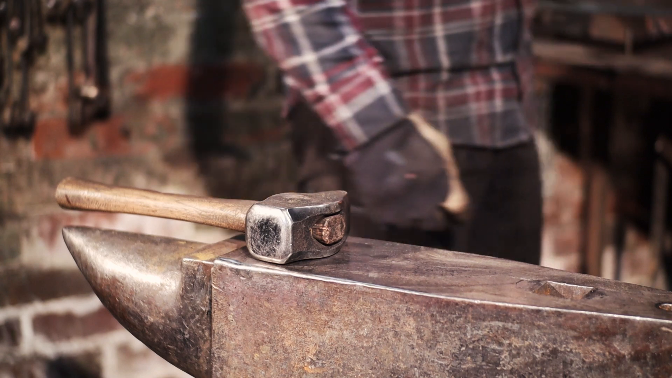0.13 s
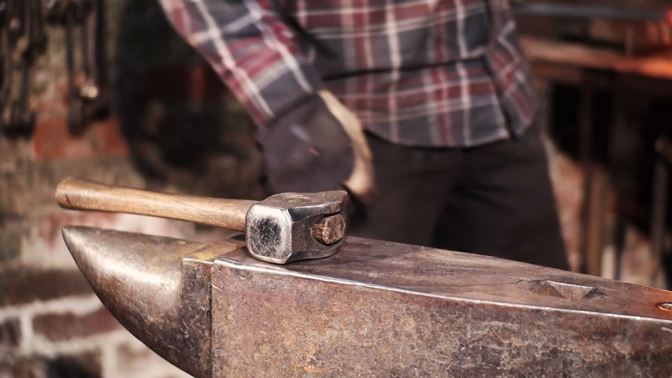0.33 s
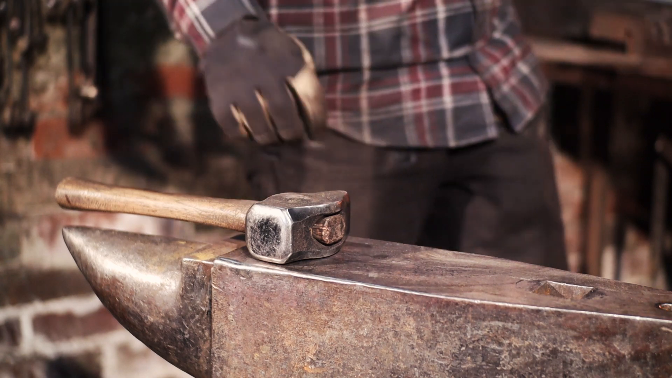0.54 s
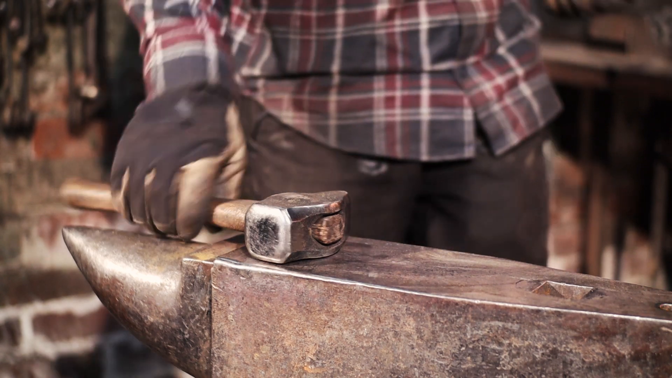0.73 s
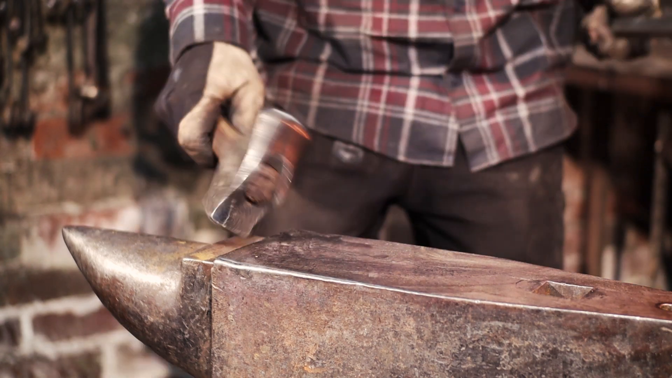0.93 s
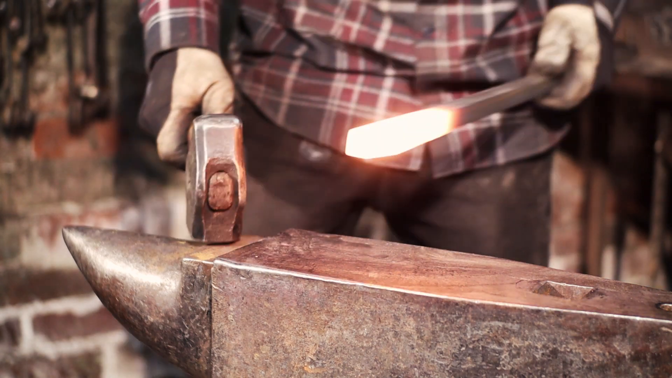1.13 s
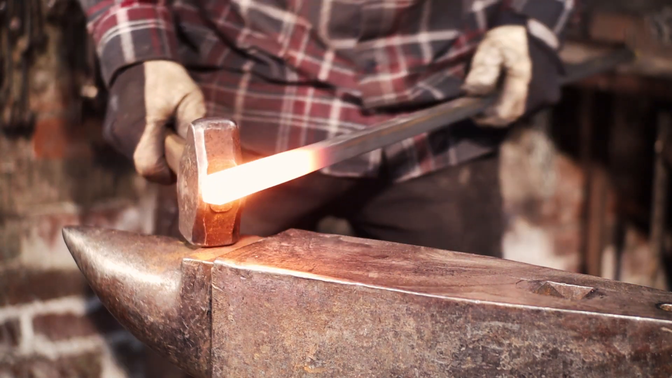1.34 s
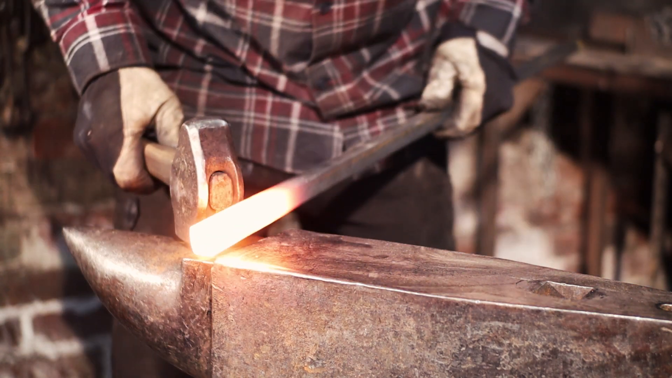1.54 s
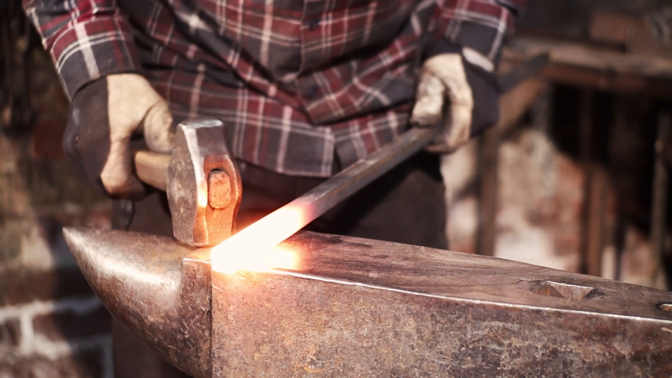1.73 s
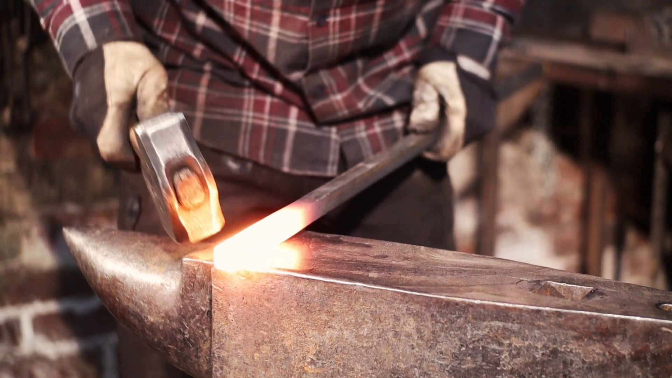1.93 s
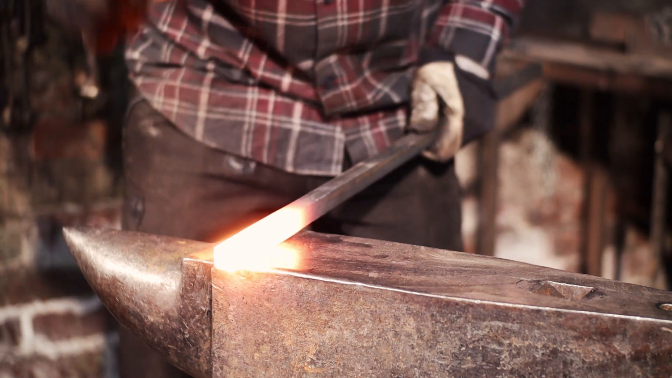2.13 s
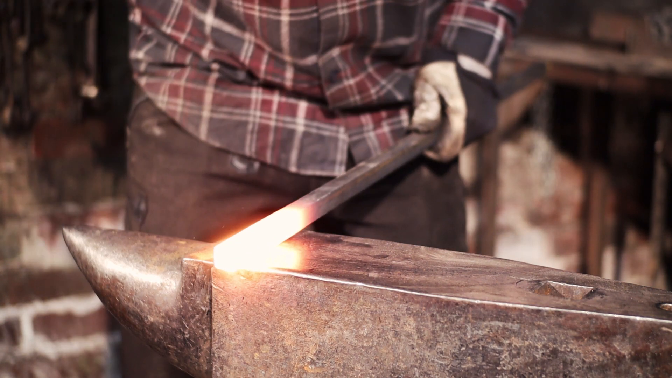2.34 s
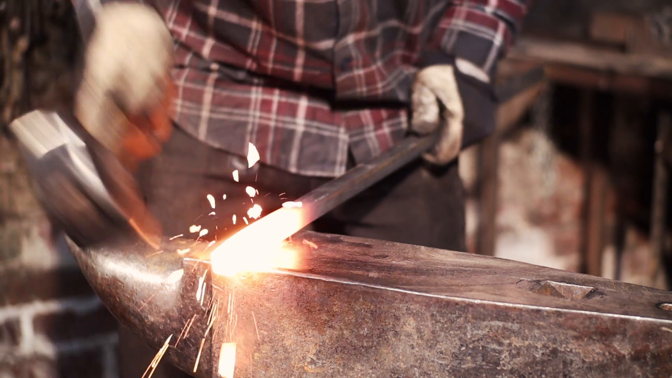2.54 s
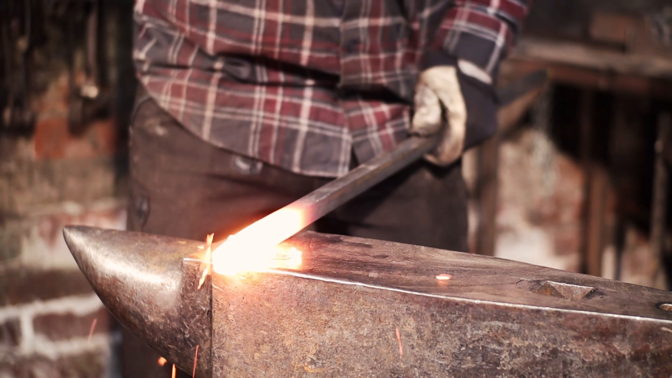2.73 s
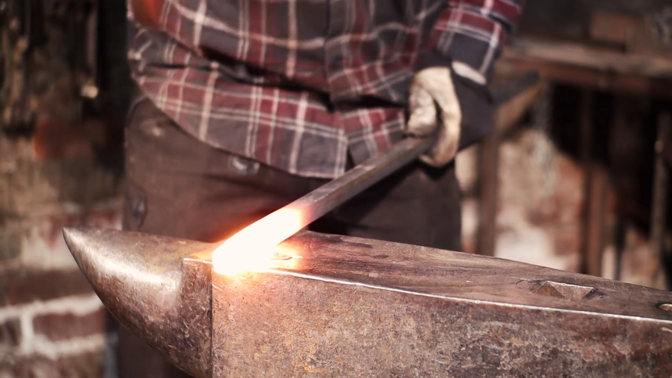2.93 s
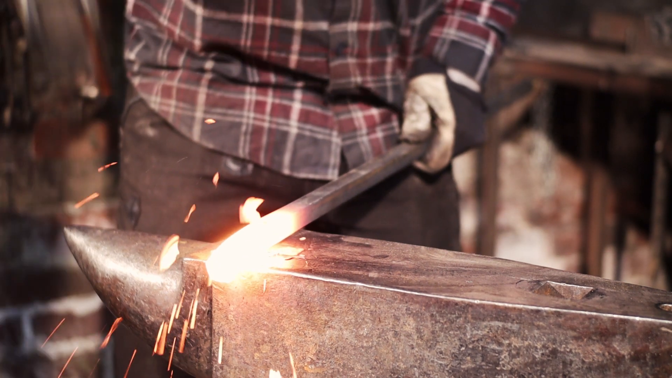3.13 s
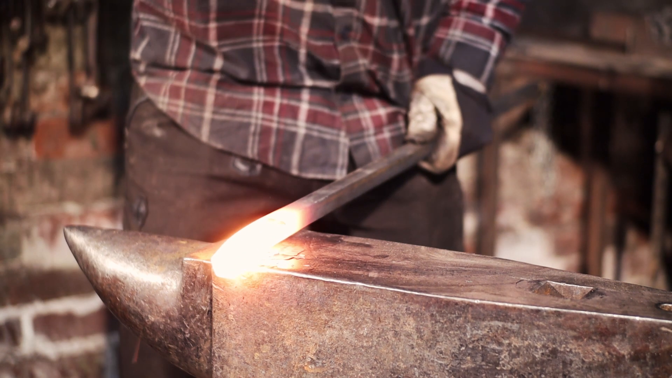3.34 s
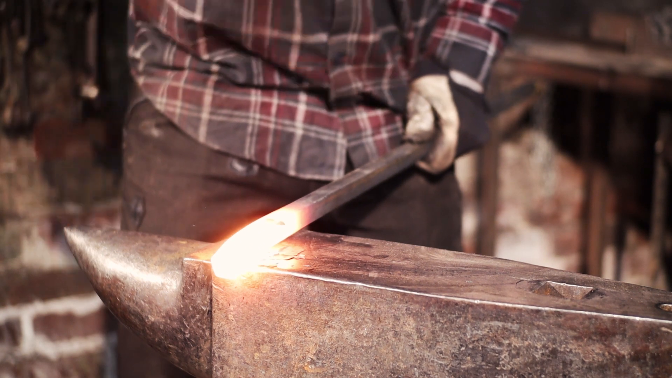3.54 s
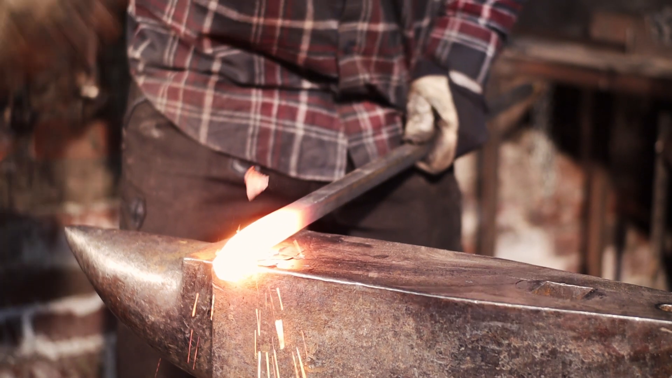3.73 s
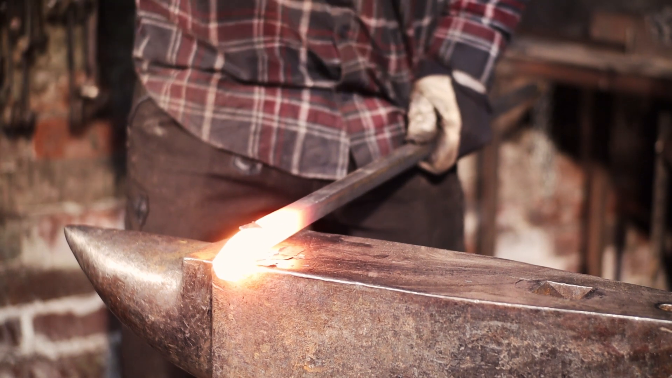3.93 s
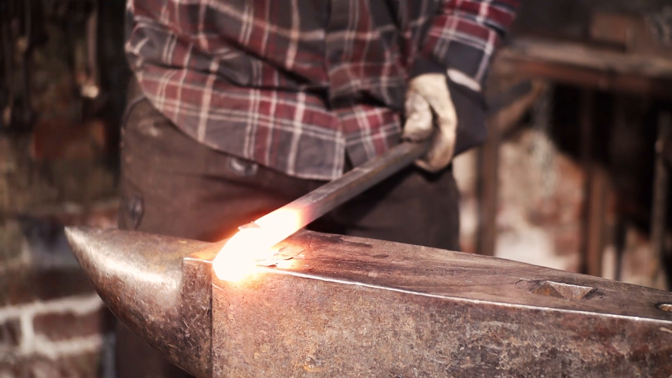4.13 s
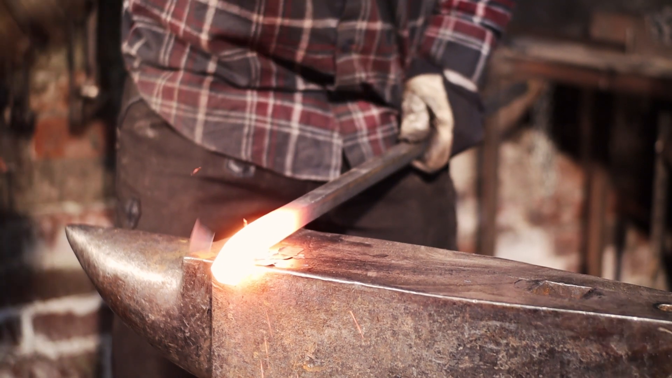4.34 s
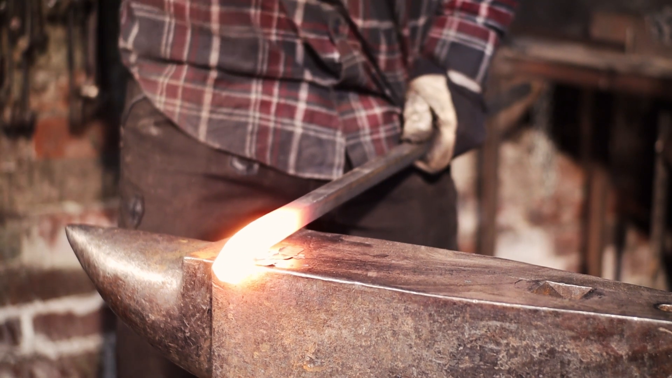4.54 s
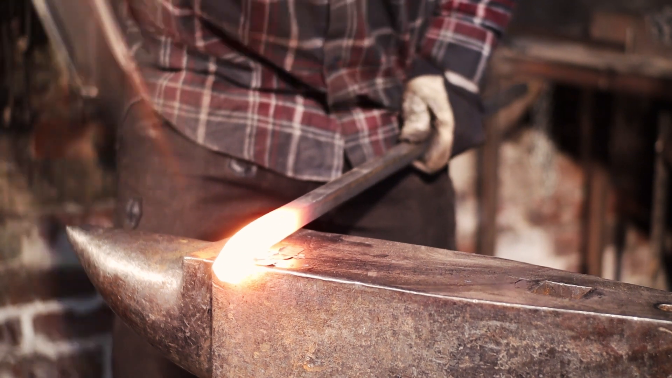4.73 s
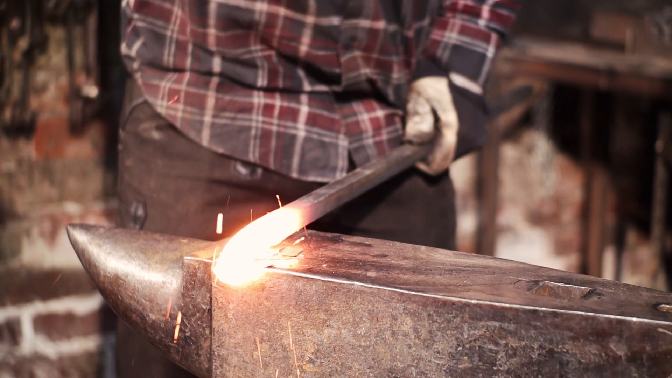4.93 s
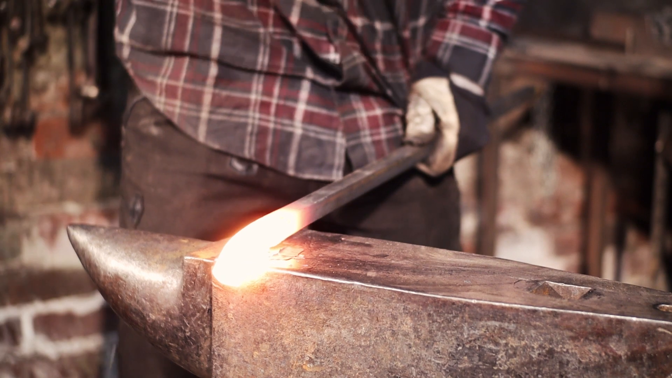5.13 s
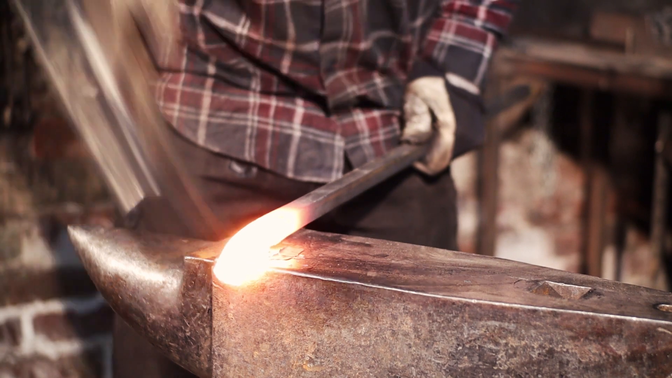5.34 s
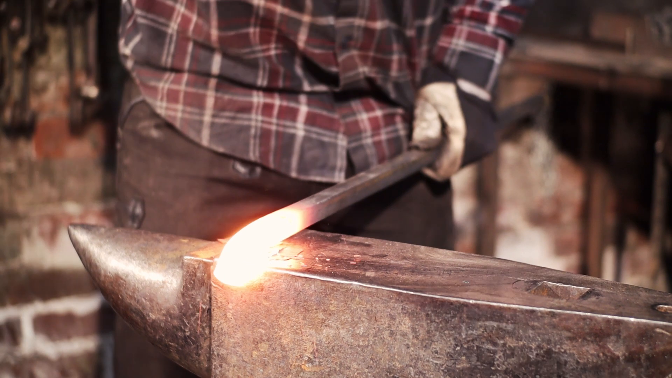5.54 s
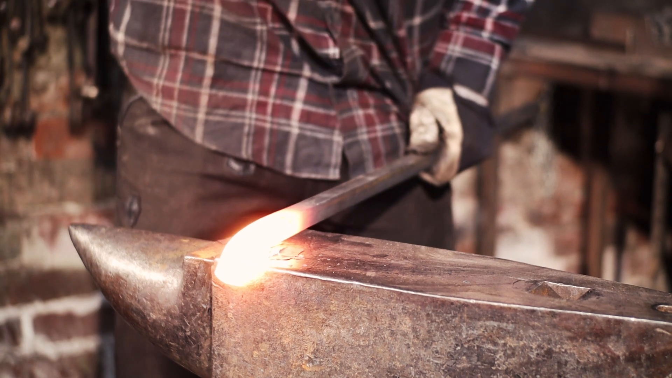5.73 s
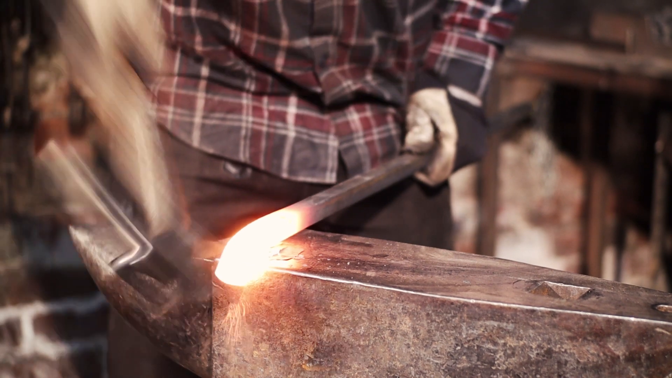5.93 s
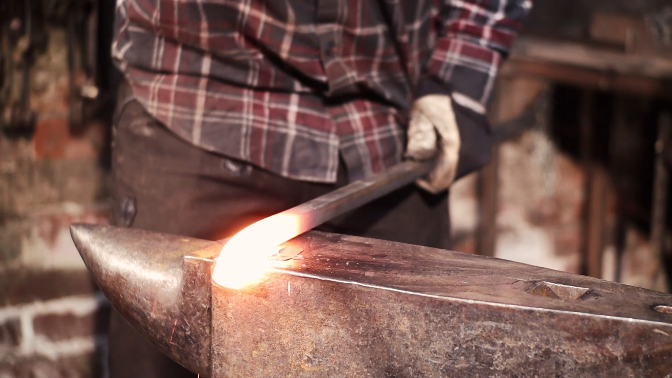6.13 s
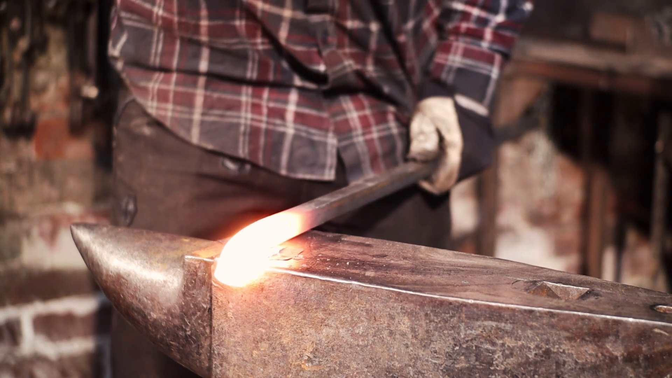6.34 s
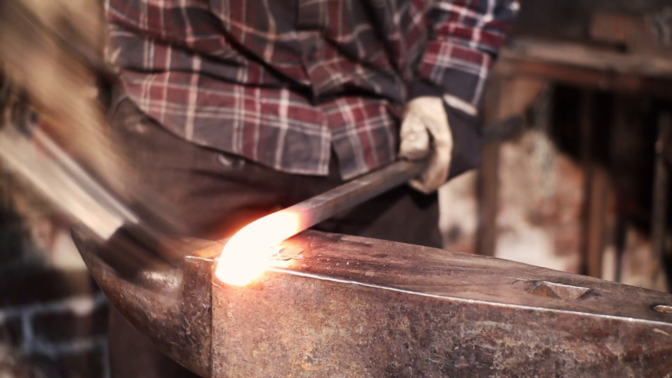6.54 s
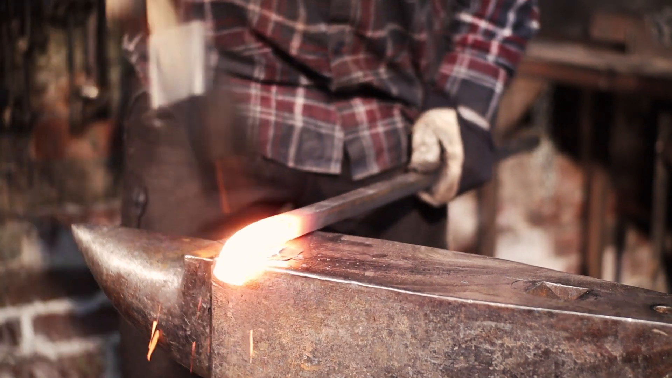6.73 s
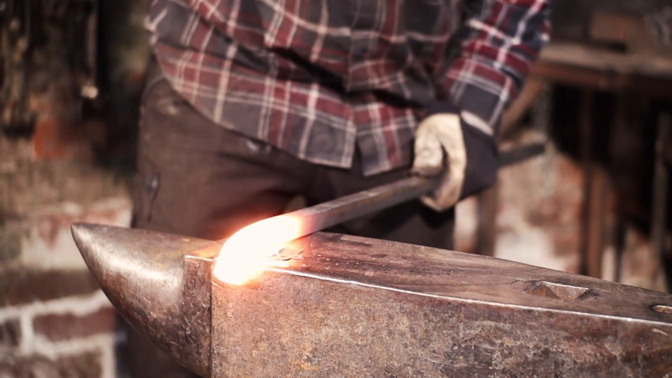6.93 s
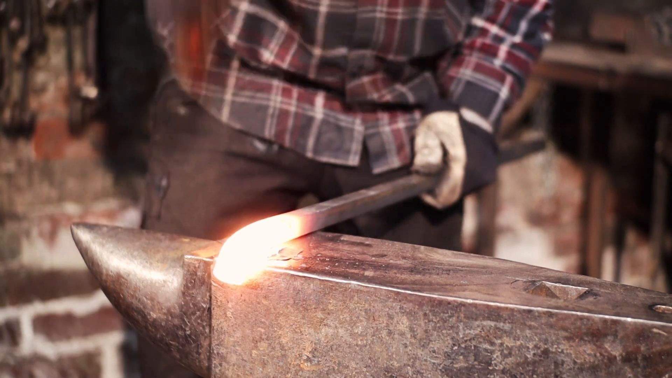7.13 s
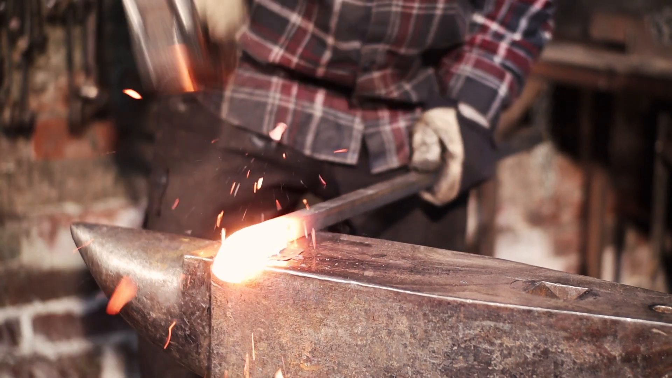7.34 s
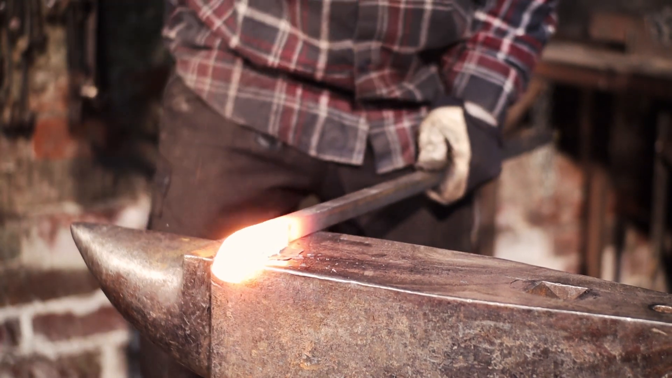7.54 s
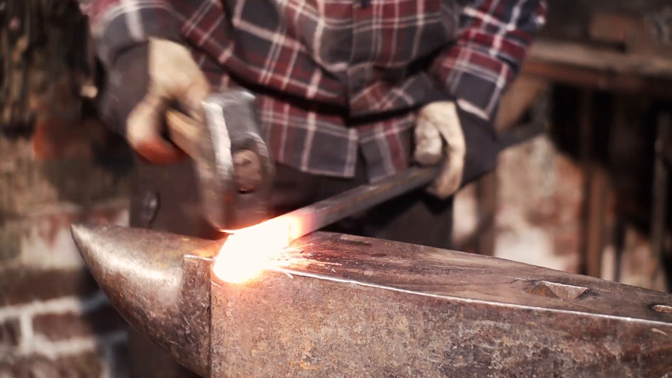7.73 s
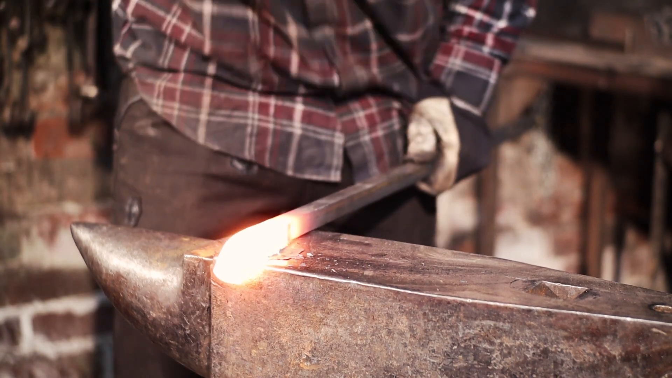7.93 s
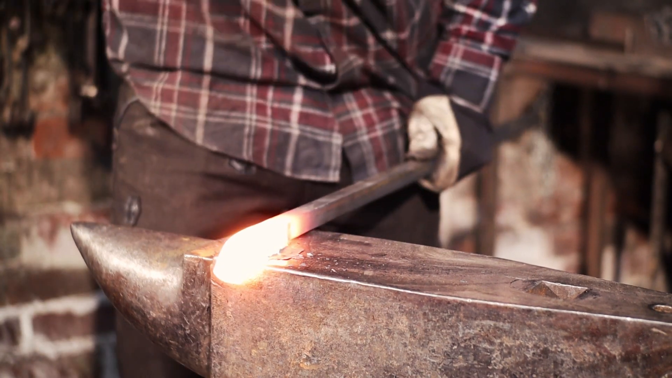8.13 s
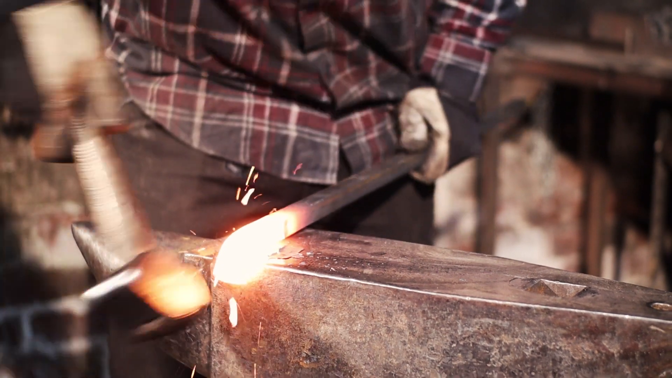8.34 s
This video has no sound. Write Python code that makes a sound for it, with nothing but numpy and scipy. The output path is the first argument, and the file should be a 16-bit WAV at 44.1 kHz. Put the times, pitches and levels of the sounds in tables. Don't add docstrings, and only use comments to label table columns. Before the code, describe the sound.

A soft fire and blower hum fills a brick forge. A metal tool drops with a quick rattling clink and a woody thump, then a hammer is lifted and set down with small knocks. A bar slides grittily into place. Steady hammer blows follow, soft at first, then hard: sharp crack, thud, short ring, low late boom. Scale flakes tick between them. Close microphone, with a short hall tail.

```python
import sys
import numpy as np
from scipy import signal
from scipy.fft import rfft, irfft
from scipy.io import wavfile
from scipy.ndimage import uniform_filter1d

SR = 44100
rng = np.random.default_rng(int(sys.argv[2]) if len(sys.argv) > 2 else 0)


def voltage_ratio(level):
    return 10 ** (np.asarray(level, float) / 20)


def unload_wav(signal):
    wavfile.write(
        sys.argv[1],
        SR,
        np.round(np.clip(np.atleast_2d(signal).T, -1, 1) * 32767).astype(np.int16),
    )


N = 369558


def unit(x):
    return x / np.sqrt(np.mean(x ** 2) + 1e-20)


def at_hz(table, hz, column=1):
    table = np.array(table)
    return np.interp(np.log(hz), np.log(table[:, 0]), table[:, column])


def coloured(spectrum):
    hz = np.fft.rfftfreq(N, 1 / SR) + 1
    white = rng.standard_normal(N)
    return unit(irfft(rfft(white) * voltage_ratio(at_hz(spectrum, hz)), N))


def wander(samples):
    return unit(uniform_filter1d(rng.standard_normal(N), size=samples))


def clicks(times, db):
    x = np.full(N, 1e-18)
    x[(np.asarray(times) * SR).astype(int)] = voltage_ratio(db)
    return x


def dull(x, hz):
    return signal.sosfilt(signal.butter(2, min(hz, 20000), fs=SR, output="sos"), x)


def bandpass(x, low_hz, high_hz):
    return signal.sosfilt(signal.butter(2, [low_hz, high_hz], "band", fs=SR, output="sos"), x)


def ring(x, modes):
    out = 0
    for hz, db, t60 in modes:
        r, w = voltage_ratio(-60 / (t60 * SR)), 2 * np.pi * hz / SR
        out = out + signal.lfilter([0, voltage_ratio(db) * np.sin(w)], [1, -2 * r * np.cos(w), r * r], x)
    return out


def swell(times, db, modes):
    t = np.arange(N // 8) / SR
    out = np.zeros(N + len(t))
    spreads = rng.standard_normal((len(times), 3))
    for start, level_db, spread in zip(times, db, spreads):
        i = int(start * SR)
        for (hz, mode_db, t60, rise), e in zip(modes, spread):
            decay = voltage_ratio(level_db + mode_db + 1.2 * e - 60 * t / t60)
            build = (1 - np.exp(-t / rise)) ** 2
            out[i:i + len(t)] += decay * build * np.sin(2 * np.pi * hz * t)
    return out[:N]


def body(x, peaks):
    out = 0
    for k, (hz, width_hz, db) in enumerate(peaks):
        r = np.exp(-np.pi * width_hz / SR)
        gain = (-1) ** k * voltage_ratio(db) * np.sqrt((1 - r * r) / 2)
        poles = [1, -2 * r * np.cos(2 * np.pi * hz / SR), r * r]
        out = out + signal.lfilter([gain, 0, -gain], poles, x)
    return out


# (frequency [Hz], density [dB per Hz])
FIRE = [(15, -66), (25, -27.5), (60, -8), (82, -17), (100, -8), (125, -14), (216, -1.5), (273, -9),
        (299, -5), (334, -16.5), (506, -11.5), (741, -17.5), (796, -10), (856, -16), (1400, -17),
        (1900, -25.5), (2470, -61.5), (4180, -120)]
BLOWER = [(1120, -30), (1900, -7.5), (2230, -3), (3200, 0), (3780, -5.5), (5780, -5.5), (6230, -16),
          (7260, -16), (10000, -29), (13000, -43.5), (22000, -120)]
FIRE_DB, BLOWER_DB = -48.5, -62.5
MAINS_HZ, MAINS_DB = 98, -55.5
WHINE_HZ, WHINE_DB = 12000, -95


def blower():
    t = np.arange(N) / SR
    waver = voltage_ratio(.4 * wander(5000))
    hum = voltage_ratio(MAINS_DB + 2.8 * wander(3000)) * np.sin(2 * np.pi * MAINS_HZ * t)
    whine = voltage_ratio(WHINE_DB) * np.sin(2 * np.pi * WHINE_HZ * t)
    air = voltage_ratio(FIRE_DB) * coloured(FIRE) + voltage_ratio(BLOWER_DB) * coloured(BLOWER)
    return waver * air + hum + whine


# (frequency [Hz], width [Hz], level [dB])
CRACK = [(3505, 250, -10), (4365, 1210, -2.5), (5100, 880, -1.5), (6260, 1300, -11.5)]
THUD = [(642, 280, -4.5), (859, 304, -1.5), (480, 203, -5.5)]
KNOCK = [(1135, 226, 0.36), (1650, 370, -2.5), (2027, 270, -3.5), (2926, 400, -2.5)]
SPIT = [(8640, 5400, -5.5), (10730, 1400, -3.5), (14000, 11000, -12.5)]
THUMP = [(392, 75, 0), (280, 90, -5)]
BITE_S = 0.00063
SPIT_SHARE, SPIT_RATTLE = 0.53, 0.41
THUMP_SEND_DB = -6


def contacts(rows, sends):
    t = np.arange(1500) / SR
    drive = np.full((2, 5, N), 1e-18)
    for (s, crack_db, thud_db, knock_db, spit_db, ms), (*send_db, depth_db) in zip(rows, sends):
        phase = t / (ms / 1000)
        bite = np.minimum(t / max(BITE_S, ms / 30000), 1)
        rattle = .1 * np.exp(-t / .009)
        force = bite * np.exp(-phase ** 2) + rattle
        chatter = force * rng.standard_normal(len(t)) * voltage_ratio(2.5 * rng.standard_normal(len(t)))
        push = -np.sin(np.pi * np.clip(t / .0006, 0, 1)) + .3 * chatter
        spit = chatter * (np.exp(-(phase / SPIT_SHARE) ** 2) + SPIT_RATTLE)
        group_db = [crack_db + 1.5, thud_db + 4.5, knock_db + 3, spit_db + 4, thud_db + depth_db + 3]
        level = voltage_ratio(group_db)[:, None]
        send = voltage_ratio(send_db + [THUMP_SEND_DB])[:, None]
        i = int(s * SR)
        drive[0, :, i:i + len(t)] += level * np.array([chatter, push, chatter, spit, push])
        drive[1, :, i:i + len(t)] += level * send * (0.3 * chatter + 12.5 * (t == 0))
    groups = [(CRACK, 8000), (THUD, 2000), (KNOCK, 4500), (SPIT, 20000), (THUMP, 1200)]
    return sum(dull(body(drive[:, k], peaks), top_hz) for k, (peaks, top_hz) in enumerate(groups))


def touches(rows, colour, send):
    full = [(s, db, *(db + np.array(colour)), ms) for s, db, ms in rows]
    return contacts(full, [send] * len(rows))


# (time [s], level [dB], contact [ms])
DROP = [
    (0.177, -28, 3.2),
    (0.1789, -24, 2.2),
    (.1832, -23.5, 1.8),
    (0.1883, -25, 5.4),
]
# (thud [dB], knock [dB], spit [dB])
DROP_COLOUR = (-0.64, -4.5, -25)


def drop_contacts():
    return touches(DROP, DROP_COLOUR, (3.2, 1.9, 1.9, 5.0, -1.4))


# (frequency [Hz], level [dB], t60 [s])
TOOL = [(2210, -1, 0.03), (2806, -5.5, 0.39), (2830, 10, 0.043), (2882, 0, 0.26), (3653, -21.5, 0.35),
        (4460, -2, 0.053), (4530, -9, .15), (8376, -27, 0.12), (8861, -22, 0.15), (9540, -29, .15),
        (5290, -24, 0.17), (7700, -36, 0.15), (3273, -7, .2), (12680, -17, .04)]


def dropped_tool():
    s, db = np.transpose(DROP)[:2]
    taps = bandpass(clicks(s + 0.00045, db), 1200, 9000)
    return voltage_ratio(1) * ring(taps, TOOL)


# (time [s], level [dB])
FLOOR_AT = [
    (.181, -31.5),
]
BENCH_AT = [
    (1.223, -42),
    (1.291, -41),
    (1.325, -42.5),
]
# (frequency [Hz], level [dB], t60 [s], rise [s])
FLOORBOARDS = [(100.6, -4, 0.98, .02), (212.5, 3, 0.87, 0.059), (427, -2, 0.86, .008)]
BENCH = [(161.3, 1, 0.42, 0.0056), (289.2, 4.5, 1, 0.0041), (370, -12, 0.18, 0.0028)]


def wood():
    return swell(*np.transpose(FLOOR_AT), FLOORBOARDS) + swell(*np.transpose(BENCH_AT), BENCH)


# (time [s], level [dB])
SOFT_BOOMS = [
    (0.181, -50),
    (1.289, -56),
]
# (frequency [Hz], level [dB], t60 [s], rise [s])
STUMP = [(62.54, 10, 0.88, 0.023), (69.77, 7.9, 0.97, .035), (82.7, 7, 1.2, 0.032)]


def soft_booms():
    return swell(*np.transpose(SOFT_BOOMS), STUMP)


# (frequency [Hz], level [dB], t60 [s])
HALL = [(108, 1, 0.57), (222, -2, 0.78), (373, -18.5, 1.06), (650, -12.5, 0.84), (1420, -15, 0.88),
        (2590, -16.5, 0.74), (4720, -20.5, 0.57), (8050, -16.5, 0.38), (12000, -24, .28), (16000, -22, 0.4)]
HALL_BUILD_S = .012


def hall(x):
    t = np.arange(int(1.2 * SR)) / SR
    white = rng.standard_normal((2, len(t)))
    edges_hz = 50 * 2 ** np.arange(0, 8.6, .5)
    echo = 0
    for k, (low, high) in enumerate(zip(edges_hz, edges_hz[1:])):
        hz = np.sqrt(low * high)
        t60 = at_hz(HALL, hz, column=2)
        band = bandpass(white[k % 2], low, high)
        build = 1 - np.exp(-t / (HALL_BUILD_S * (.6 + 600 / hz)))
        decay = voltage_ratio(at_hz(HALL, hz) - 60 * t / t60)
        echo = echo + band * build * decay / np.sqrt(t60 * SR / 14)
    return signal.fftconvolve(x, voltage_ratio(12.5) * echo)[:N]


# (time [s], rise [s], hold [s], fall [s], level [dB])
SLIDES = [
    (.73, 0.023, 0.11, 0.06, -79.5),
    (1.526, 0.041, 0.11, 0.12, -68.5),
    (6.595, .088, .002, 0.0016, -63.5),
    (7.764, .012, .012, .02, -74.5),
]
# (frequency [Hz], density [dB per Hz])
SLIDE = [(880, -31), (1500, 4.5), (2060, -4), (3120, -3), (5020, -1.5), (6310, -10), (14800, -23),
         (16000, -29)]
SLIDE_EDGE_DB = -24.5


def slides():
    t, gain = np.arange(N) / SR, 0
    for s, rise, hold, fall, db in SLIDES:
        corners = np.cumsum([s, rise, hold, fall])
        shape_db = np.interp(t, corners, [SLIDE_EDGE_DB, 0, 0, SLIDE_EDGE_DB])
        gain = gain + voltage_ratio(db + shape_db) * (t > s) * (t < corners[-1])
    grit = voltage_ratio(2.0 * wander(150))
    return voltage_ratio(19) * gain * grit * coloured(SLIDE)


# (time [s], level [dB], contact [ms])
HANDLING = [
    (0.9003, -50.5, 3.9),
    (0.9698, -49.5, 5.5),
    (0.9814, -50, 9.7),
    (1.222, -41.5, 7.2),
    (1.287, -43.5, 14),
    (1.3206, -46, 9.8),
    (1.3449, -47, 2.9),
    (6.5116, -53.5, 2.7),
]
# (thud [dB], knock [dB], spit [dB])
HANDLING_COLOUR = (1.2, 2.2, -25)


def handling():
    return touches(HANDLING, HANDLING_COLOUR, (3.5, 10.5, 3.4, 1.6, 4.9))


# (time [s], level [dB])
SETTLE_AT = [
    (0.903, -47.5),
    (1.223, -48),
    (1.29, -44.5),
    (1.323, -46.5),
]
PING_AT = [
    (.984, -61),
    (8.06, -69),
]
# (frequency [Hz], level [dB], t60 [s])
SETTLE = [(2562, -7.5, 0.68), (2415, -5, .2), (3870, 12, 0.017), (4200, 9, 0.024), (4880, -5, .05),
          (5733, -19, .2), (2812, -4, 0.13)]
PING = [(12300, -3, 0.4)]


def pings():
    settling = ring(dull(clicks(*np.transpose(SETTLE_AT)), 4200), SETTLE)
    return ring(clicks(*np.transpose(PING_AT)), PING) + settling


# (time [s], crack [dB], thud [dB], spit [dB], contact [ms])
BLOWS = [
    (2.5955, -23.5, -28.5, -33.5, 12.8),
    (3.1287, -18, -24, -31.5, 6.6),
    (3.7293, -9.5, -14.5, -22.5, 2.96),
    (4.3223, -12.5, -14.5, -22, 4),
    (4.8946, -10, -15, -22.5, 3.3),
    (5.4796, -3, -11.5, -16, 2.45),
    (6.0731, -8.5, -11.5, -13.5, 2.37),
    (6.6923, -19, -14.5, -44.5, 7),
    (7.3281, -6.5, -16, -17, 5.24),
    (7.8384, -8.5, -12.5, -39, 2.7),
]
# (low head modes [dB], middle head modes [dB], stand [dB], weight on stump [dB])
RINGS = [(-23, -19.5, -19.5, -34), (-26, -27.5, -20.5, -31), (-25.5, -29, -20, -35), (-24, -42, -20.5, -35),
         (-16.5, -40, -22, -35.5), (-33, -62, -23.5, -37), (-13, -22, -26, -38.5), (-20, -30, -24.5, -39),
         (-20, -15.5, -19, -34), (-21, -19.5, -22, -35.5)]
KNOCK_DB, KNOCK_PER_CRACK = -20, 0.77
# (crack [dB], knock [dB], spit [dB])
SEND_DB = (-0.2, -1.5, -4)
SEND_DB_PER_DOUBLING = (5, 3.7, 8.5)
THUD_SEND_DB, THUD_SEND_PER_THUD = -1, -0.27
THUMP_DB, THUMP_PER_STAND = -18.5, -0.26


def blow_contacts():
    s, crack_db, thud_db, spit_db, ms = np.transpose(BLOWS)
    stand_db = np.transpose(RINGS)[2]
    knock_db = KNOCK_DB + KNOCK_PER_CRACK * (crack_db + 11)
    growth_db = np.outer(SEND_DB_PER_DOUBLING, np.log2(ms / 5))
    crack_send, knock_send, spit_send = np.array(SEND_DB)[:, None] + growth_db
    thud_send = THUD_SEND_DB + THUD_SEND_PER_THUD * (thud_db + 15)
    thump_db = THUMP_DB + THUMP_PER_STAND * (stand_db + 23)
    rows = np.c_[s, crack_db, thud_db, knock_db, spit_db, ms]
    return contacts(rows, np.c_[crack_send, thud_send, knock_send, spit_send, thump_db - thud_db])


# (end [Hz], extra [Hz], glide [s], t60 [s])
SWEEP = (95, 520, .028, 0.18)


def sweep(times, db):
    end_hz, extra_hz, glide, t60 = SWEEP
    t = np.arange(N // 30) / SR
    turns = end_hz * t + extra_hz * glide * (1 - np.exp(-t / glide))
    thud = voltage_ratio(-60 * t / t60) * (1 - np.exp(-t / 0.011)) * np.sin(2 * np.pi * turns)
    return signal.fftconvolve(clicks(times, db), thud)[:N]


# (frequency [Hz], level [dB], t60 [s], rise [s])
STAND = [(268, 5.5, 0.057, 0.00087), (190.6, -9, 0.3, 0.0087), (150.2, -10.5, 0.38, 0.01)]
WALLS = [(254.7, 6.5, 0.87, 0.021), (309.4, 1.5, 0.97, 0.066), (146, 4.5, 1, 0.014)]


def stand_and_stump():
    s = np.transpose(BLOWS)[0] + .0008
    stand_db, stump_db = np.transpose(RINGS)[-2:]
    stand = swell(s, stand_db + 2.0, STAND) + sweep(s, stump_db + 18)
    return stand, swell(s, stump_db, STUMP) + swell(s, stump_db - 5, WALLS)


# (frequency [Hz], level [dB], t60 [s])
HEAD_LOW = [(2415, -3, .3), (2417, -12, 1.1), (2429, -14, 1.1), (2972, -19, 1.0), (2175, -20, .9)]
HEAD_MID = [(5208, -2, .17), (6010, -18, .22)]
HEAD_HIGH = [(14340, -5, .17), (15415, -11, .18)]
HIGH_RING_DB, HIGH_RING_PER_SPIT = -45, 1.35


def head():
    s, spit_db = np.transpose(BLOWS)[[0, 3]]
    low_db, mid_db = np.transpose(RINGS)[:2]
    high_db = HIGH_RING_DB + HIGH_RING_PER_SPIT * (spit_db + 25)
    s = s + 0.0024
    low = ring(clicks(s, low_db - 15.5), HEAD_LOW)
    mid = ring(clicks(s, mid_db - 1), HEAD_MID)
    return low + mid + ring(clicks(s, high_db - 6), HEAD_HIGH)


# (time [s], level [dB], contact [ms])
SKIPS = [
    (2.6002, -19.5, 18.4),
    (3.134, -28.5, 21),
    (6.697, -30, 23),
    (7.8425, -18, 7.6),
]
# (thud [dB], knock [dB], spit [dB])
SKIP_COLOUR = (-20, -12, -15)


def skips():
    return touches(SKIPS, SKIP_COLOUR, (.1, .1, .1, .1, 0.18))


# (time [s], peak level [dB])
FLAKES = [(2.8514, -60), (2.8973, -58), (2.9442, -57), (2.9744, -59), (3.0215, -57), (3.369, -53),
          (3.3972, -53), (3.5128, -45.5), (3.985, -55), (4.1395, -58), (4.6583, -53), (5.0694, -57),
          (5.1178, -59), (5.1966, -59), (5.3567, -49), (5.3932, -42.5), (6.5114, -75), (6.993, -55),
          (7.0394, -66), (7.568, -45.5), (7.6026, -56), (7.9897, -62), (8.0512, -55)]


def flakes():
    tick = rng.standard_normal(120) * np.exp(-np.arange(120) / 30.0)
    ticks = np.convolve(clicks(*np.transpose(FLAKES)), tick)[:N]
    return voltage_ratio(4.5) * signal.sosfilt(signal.butter(2, 6500, "high", fs=SR, output="sos"), ticks)


# (time [s], low modes [dB], high modes [dB])
FACE_AT = [
    (7.331, -34, -23),
    (7.841, -24.5, -36),
]
# (frequency [Hz], level [dB], t60 [s])
FACE_LOW = [(2175, -3, .22), (2205, -7, .2), (2552, -11, .25), (2826, -5, .25), (2900, -8, .22),
            (3000, -10, .2)]
FACE_HIGH = [(3660, -10, 0.38), (4417, -3, 0.26), (4530, -16, 0.24), (4640, -6, .25), (5440, -2.5, .2)]


def face():
    s, low_db, high_db = np.transpose(FACE_AT)
    return ring(clicks(s, low_db), FACE_LOW) + ring(clicks(s, high_db), FACE_HIGH)


FACE_SEND_DB, RINGING_SEND_DB, STAND_SEND_DB = -0.5, -11, -8.5


def scene():
    near, far = sum(np.array(f()) for f in (drop_contacts, handling, blow_contacts, skips))
    ringing = dropped_tool() + pings() + head()
    stand, boom = stand_and_stump()
    stand = stand + wood()
    bare = face()
    far = far + voltage_ratio(RINGING_SEND_DB) * ringing + voltage_ratio(FACE_SEND_DB) * bare + voltage_ratio(STAND_SEND_DB) * stand
    close = near + ringing + bare + stand + boom + soft_booms() + flakes() + slides()
    return (close + hall(far) + blower())[None]


def band_limit(x):
    return signal.sosfilt(signal.butter(12, 17090, fs=SR, output="sos"), x)


MIC_HISS_DB, CEILING, CUTOFF_HZ = -78.5, .68, 17100


def record(dry):
    x = dry + voltage_ratio(MIC_HISS_DB) * rng.standard_normal(dry.shape)
    x = signal.sosfilt(signal.butter(3, 42, "high", fs=SR, output="sos"), x)
    x = x / (1 + (x / CEILING) ** 4) ** .25
    x = signal.sosfilt(signal.cheby2(10, 60, CUTOFF_HZ, fs=SR, output="sos"), x)
    return band_limit(x)


dry = scene()
out = record(dry)
unload_wav(out)
```